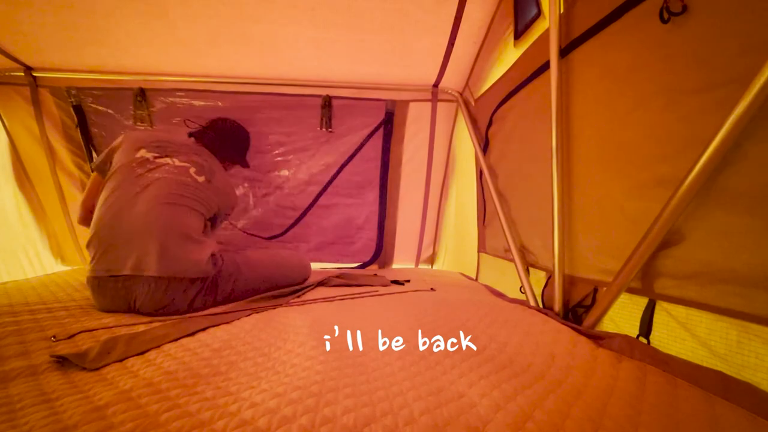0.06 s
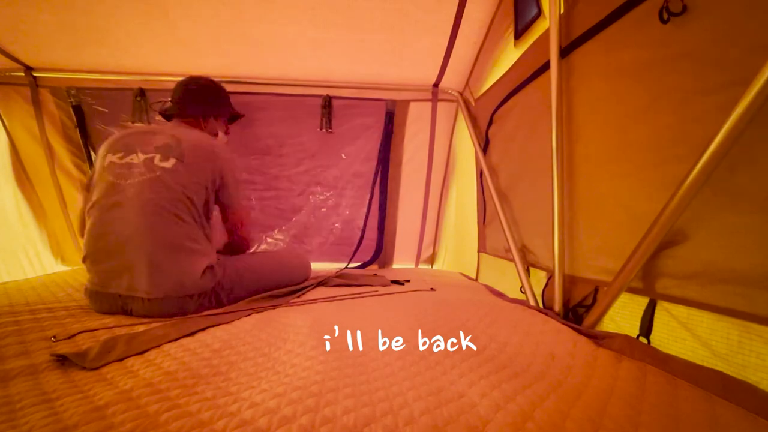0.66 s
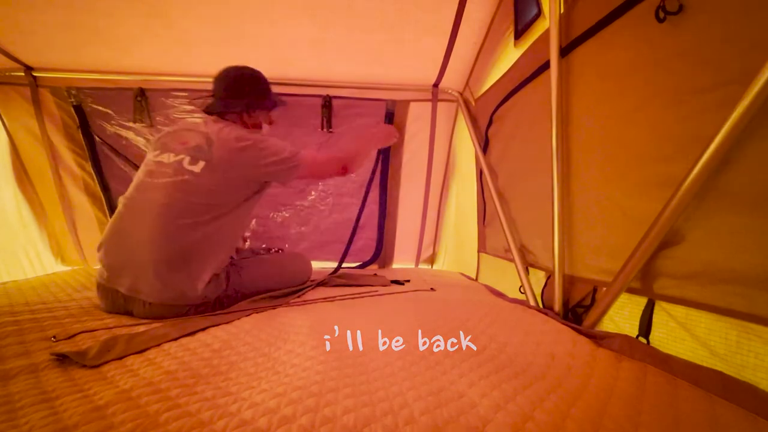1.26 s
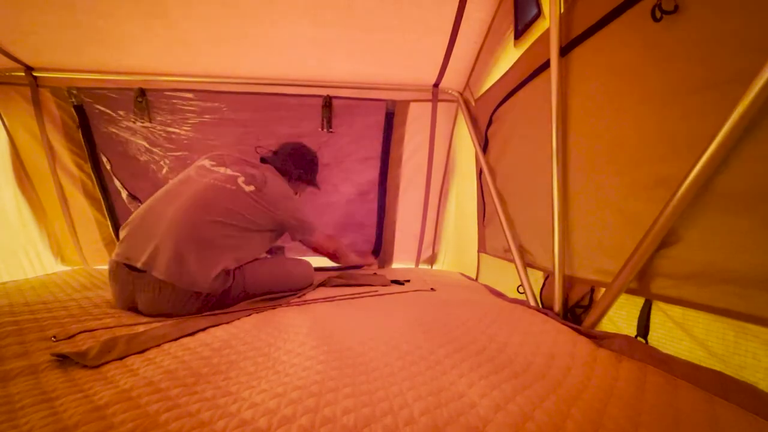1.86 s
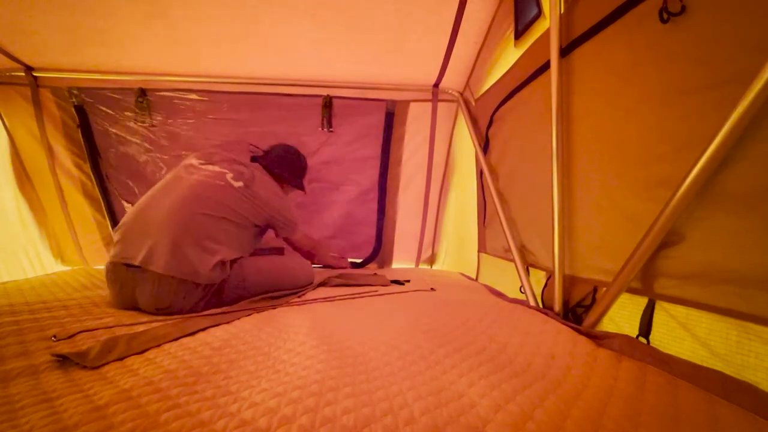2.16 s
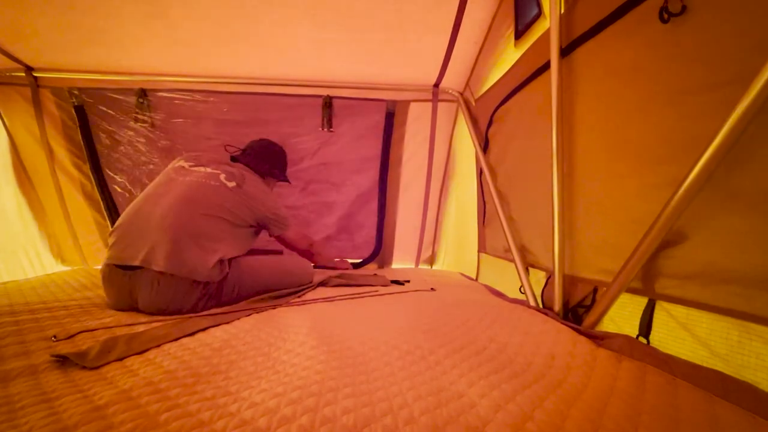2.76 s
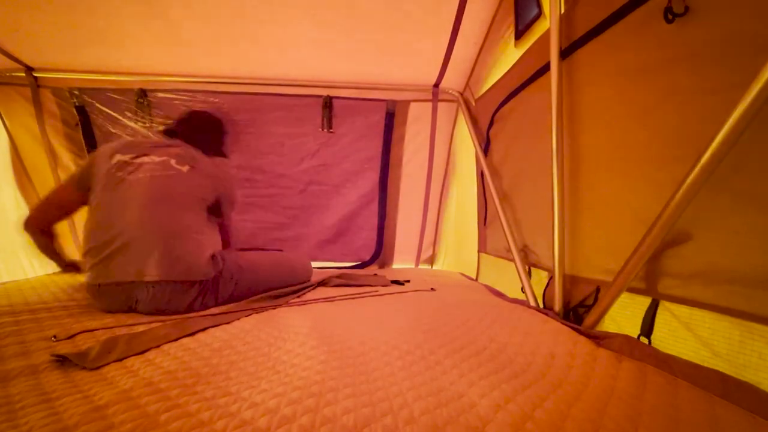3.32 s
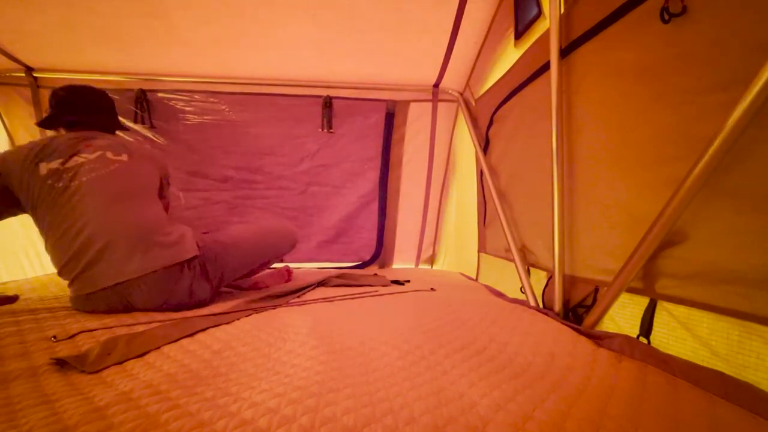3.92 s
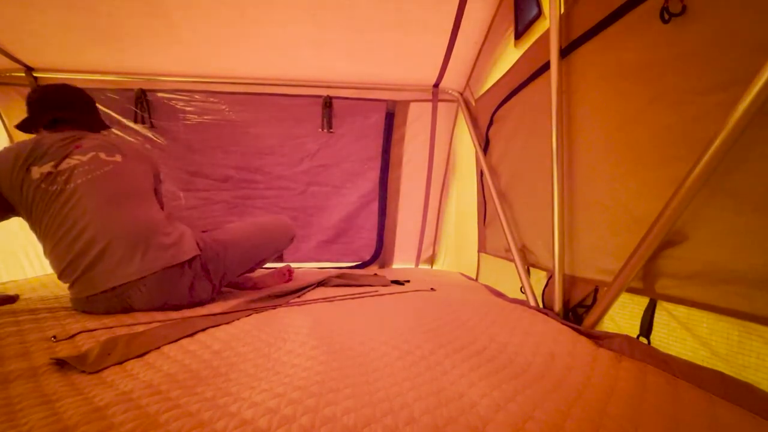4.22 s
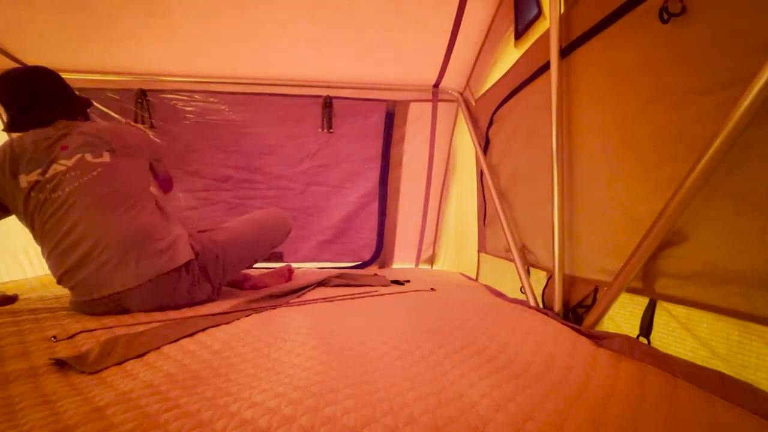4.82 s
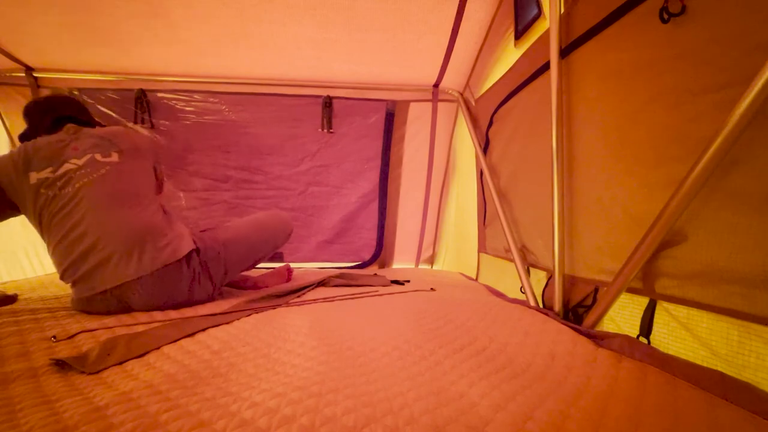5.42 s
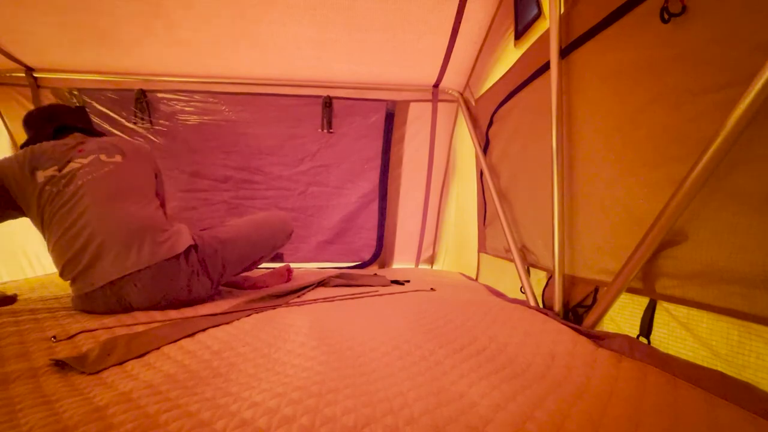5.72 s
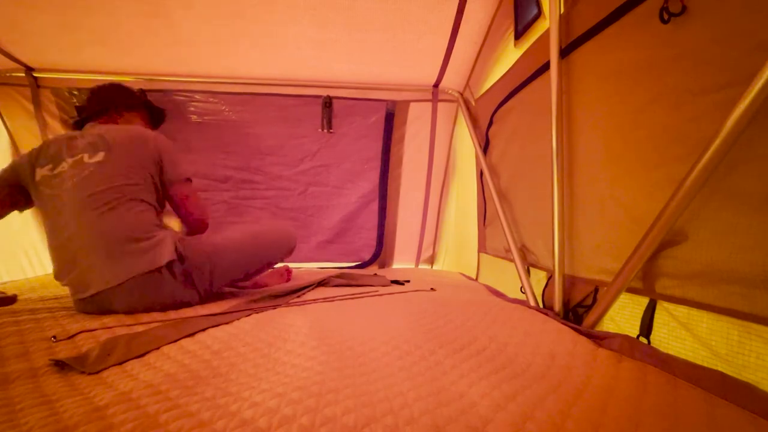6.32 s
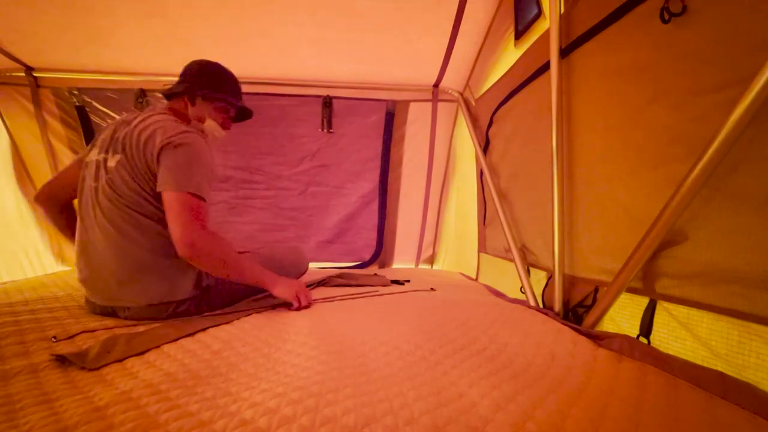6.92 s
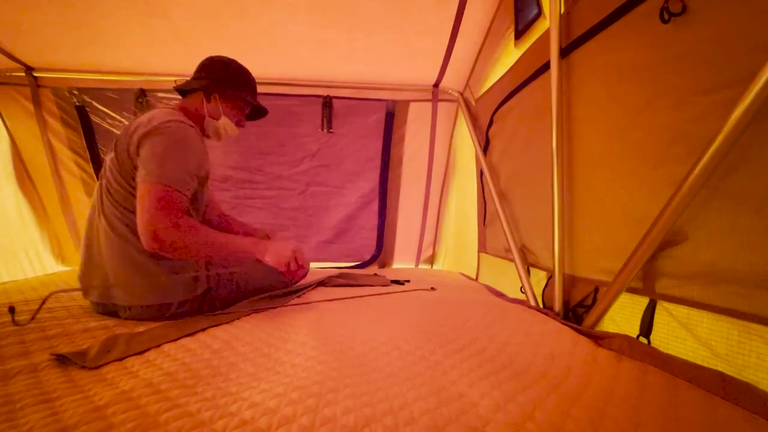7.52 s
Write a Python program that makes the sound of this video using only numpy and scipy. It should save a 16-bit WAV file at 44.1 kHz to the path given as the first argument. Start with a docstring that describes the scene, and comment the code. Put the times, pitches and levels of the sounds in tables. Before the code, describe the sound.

Inside a small tent, someone zips a window closed in several rasping pulls, amid clicking metal tabs and rustling cloth.

```python
"""Zipping shut a tent window

Someone zips a panel shut inside a small tent: a short nudge, then three long strokes.
The slider strikes two rows of teeth in turn, so it rasps and whines, higher as it speeds up.
When it creeps, the teeth tick one by one. The pulled fabric flutters and flaps, pull tabs click,
and clothes rustle and swish. The tent adds a very short echo, and the outdoors rumbles faintly."""
import sys
import numpy as np
from scipy import signal
from scipy.fft import rfft, irfft, next_fast_len
from scipy.io import wavfile

SR = 44100
rng = np.random.default_rng(int(sys.argv[2]) if len(sys.argv) > 2 else 0)


def wrap_up_sound(samples):
    """Save the sound to the file named by the first command line argument, as 16-bit audio."""
    columns = np.atleast_2d(samples).T
    # keep every value between -1 and 1, then stretch to whole-number steps
    tamed = np.clip(columns, -1, 1)
    steps = np.round(tamed * 32767).astype(np.int16)
    wavfile.write(sys.argv[1], SR, steps)


N = 334278
T = np.arange(N) / SR


def undb(db):
    """Turn decibels into a number to multiply by."""
    return 10 ** (np.asarray(db) / 20)


def unit(x):
    """Scale a signal so that its average power is 1."""
    return x / np.sqrt(np.mean(x ** 2) + 1e-20)


def gain_at(points, hz):
    """Read the gain at a pitch from a tone curve with rows of pitch_hz, level_db."""
    pitch_hz, level_db = np.transpose(points)
    return undb(np.interp(np.log(hz + 1), np.log(pitch_hz), level_db))


def colour(x, points):
    """Filter a sound with a tone curve; white noise keeps its power."""
    size = 4096
    gain = unit(gain_at(points, np.fft.rfftfreq(size, 1 / SR)))
    # make the filter ring only after a sound, never before it
    cepstrum = irfft(np.log(gain))
    cepstrum[1:size // 2] *= 2
    cepstrum[size // 2 + 1:] = 0
    ring = irfft(np.exp(rfft(cepstrum)))
    return signal.fftconvolve(x, ring)[:N]


def wander(hz):
    """A random curve of size about 1 that takes a new value hz times a second."""
    return unit(np.interp(T * hz, np.arange(N // 8), rng.standard_normal(N // 8)))


def grains(rate_hz, spread_db):
    """Rubbing noise made of tiny catches of uneven size."""
    return unit(rng.standard_normal(N) * undb(spread_db * wander(rate_hz)))


def bursts(starts_s, levels_db, decay_s):
    """A short, fading rattle of noise at each start time."""
    loudness = np.zeros(N)
    for start_s, level_db in zip(starts_s, levels_db):
        start = max(int(start_s * SR), 0)
        age = T[:min(SR // 8, N - start)]
        loudness[start:start + len(age)] += undb(level_db) * np.exp(-age / decay_s)
    return loudness * rng.standard_normal(N)


def gestures(table, attack_s, release_s):
    """Each movement swells, holds and dies away; gives one loudness curve per level column."""
    t = T[::64]
    power = 0
    for start_s, length_s, *levels_db in table:
        before = np.maximum(start_s - t, 0)
        after = np.maximum(t - start_s - length_s, 0)
        shape = np.exp(-before / attack_s - after / release_s)
        power = power + (undb(levels_db)[:, None] * shape) ** 2
    return [np.interp(T, t, np.sqrt(p)) for p in power]


def tent(x, echo_s, echo_db, lag_ms, left_db, shared_hz=285):
    """Direct sound plus brief echoes off moving cloth walls; both ears share the bass."""
    size = next_fast_len(N + SR // 4)
    hz = np.fft.rfftfreq(size, 1 / SR)
    age = T[:SR // 4]
    tails = rng.standard_normal((2, 2, len(age))) * undb(-60 * age / echo_s) * np.minimum(age / .002, 1)
    tails /= np.sqrt(np.sum(tails ** 2, axis=-1, keepdims=True))
    echo_share = hz ** 4 / (hz ** 4 + shared_hz ** 4) / np.sqrt(1 + undb(-echo_db) ** 2)
    sides = np.array([[1], [-1]])
    lag = np.exp(1j * np.pi * hz * sides * lag_ms / 1000)  # one ear hears it first
    spectrum = rfft(x, size)
    direct = irfft(spectrum * lag * np.sqrt(1 - echo_share ** 2), size)[:, :N]
    first, second = irfft(spectrum * echo_share * rfft(tails, size), size)[..., :N]
    # as the walls billow, one pattern of echoes gives way to another
    billow = np.pi * wander(7)
    return (direct + first * np.cos(billow) + second * np.sin(billow)) * undb(sides * left_db / 2)


def hand_pull(stroke, fade_s=.022):
    """One stroke's teeth per second and pulling force; the hand takes up and lets go smoothly."""
    time_s, rate_hz, pull_db = np.transpose(stroke)
    fade = np.clip(.5 + np.minimum(T - time_s[0], time_s[-1] - T) / fade_s, 0, 1)
    rate = (fade > 0) * np.interp(T, time_s, rate_hz)
    pull = fade * undb(np.interp(T, time_s, pull_db))
    return np.array([rate, pull])


def squeal(multiple):
    """How one tone of the whine, at this multiple of the tooth rate, briefly swells or sinks."""
    # swells and dips: peak_s, width_s, multiple, change_db
    swells = [(0.04, 0.047, 1, -1), (0.102, 0.012, 2, 11), (1.462, 0.042, 2, 10.5), (1.44, .02, 4, 13),
              (1.586, 0.026, 3, 8.5), (1.72, 0.05, 3, 5), (1.794, 0.036, 1, 13.5), (1.808, 0.015, 2, 4),
              (2.92, 0.068, 2, -6.5), (2.945, 0.019, 1, 8.5), (3.06, 0.035, 2, 7.5), (3.18, 0.022, 3, 3),
              (3.309, 0.017, 2, 2), (3.441, 0.019, 2, 9)]
    return undb(sum(change_db * np.exp(-.5 * ((T - peak_s) / width_s) ** 2)
                    for peak_s, width_s, k, change_db in swells if round(k) == multiple))


def zipper(rate_hz, whine_gain, rasp_gain, jitter=.023, shudder_db=2, row_db=-1, fray_db=-9,
           overtone_db=-3, rasp_db=6, bite=.42, hollow_hz=1500, fast_hz=1200):
    """Two rows of teeth mesh in turn: a whine with a strong octave, and a rasp at each tooth."""
    # how well tape and panel give off the two lowest tones: pitch_hz, level_db
    whine_tone = [(200, -1), (450, 8), (620, 7.5), (820, 5.5), (1050, 3), (1220, 8.5), (1480, 15),
                  (2000, 7), (2600, 9), (3500, 7.5), (4300, 2.5)]
    # the same for the higher tones: pitch_hz, level_db
    upper_tone = [(300, 21), (1200, 1), (2400, 5), (2900, 6), (3400, 2), (4000, -1), (4900, 8),
                  (5700, -7.5), (9000, 4)]
    # tone of the slider scraping the teeth: pitch_hz, level_db
    rasp_tone = [(250, -14.5), (450, -4.5), (800, -7), (1700, -2), (2700, -6), (4000, -10), (4900, -11),
                 (5700, -12), (6300, -6), (6900, -3.5), (7500, -16), (8400, -8), (10200, -16.5),
                 (12400, -11), (16000, -16)]
    row, octave = (whine_gain * gain_at(whine_tone, k * rate_hz) * squeal(k) for k in (1, 2))
    # the slider catches and hurries, so the teeth never come quite evenly
    phase = 2 * np.pi * np.cumsum(rate_hz * (1 + jitter * wander(220))) / SR
    grip = unit(undb(shudder_db * wander(170)))
    whine = undb(row_db) * row * np.sin(phase) + octave * np.sin(2 * phase)
    # the flexing tape shakes the octave in size and timing, which frays it
    fray = (wander(600) * np.sin(2 * phase) + wander(600) * np.cos(2 * phase)) / np.sqrt(2)
    whine += undb(fray_db) * octave * fray
    for k in range(3, 9):
        strength = whine_gain * squeal(k) * gain_at(upper_tone, k * rate_hz) * (3 / k) ** 1.72
        flicker = 1 + .6 * wander(300)
        whine += undb(overtone_db) * strength * flicker * np.sin(k * phase + .44 * wander(300))
    strikes = unit(np.exp(bite * (np.cos(2 * phase) + np.cos(phase))))
    rasp = colour(grains(1100, 1.6) * strikes * rasp_gain * grip, rasp_tone) * undb(rasp_db)
    # a fast slider skims the teeth, so its rasp sounds thinner
    body = signal.sosfiltfilt(signal.butter(2, hollow_hz, fs=SR, output="sos"), rasp)
    rasp -= body * rate_hz ** 2 / (rate_hz ** 2 + fast_hz ** 2)
    return (tent(np.sqrt(2) * whine * grip, echo_s=.05, echo_db=8, lag_ms=.16, left_db=1.65)
            + tent(rasp, echo_s=.12, echo_db=3, lag_ms=.054, left_db=2.5))


def fabric(shake, rise_s=.0072, flap_db=-2, drum_db=-2, sway_db=-1, sag=.6, slack_db=-6,
           rest_drum_db=-62, rest_sway_db=-60):
    """Pulls and shoves make the tight panel drum and the slack walls sway; jerks make the panel flap."""
    # a hand or body shoves the tent: start_s, length_s, drum_db, sway_db
    shoves = [(0.0, 0.15, -42, -49.5), (0.205, .02, -54, -43.5), (0.38, 0.037, -47.5, -46),
              (0.885, 0.13, -40.5, -43), (1.585, 0.017, -35.5, -54), (2.012, 0.058, -26.5, -59),
              (2.08, 0.13, -40.5, -43), (2.31, 0.045, -43.5, -47), (2.41, 0.12, -50, -42),
              (2.68, 0.15, -41.5, -47.5), (2.815, .025, -29, -43), (3.485, .025, -46, -32.5),
              (3.69, 0.11, -38, -39.5), (3.83, 0.067, -51, -41), (4.28, 0.42, -57, -58),
              (5.39, 0.038, -43.5, -57), (5.76, .05, -32.5, -38.5), (5.84, 0.045, -51, -47.5),
              (6.95, 0.11, -73, -56), (7.225, .02, -60, -55)]
    # tone of the tight panel: pitch_hz, level_db
    drum_tone = [(70, -27), (110, -2), (150, 1.5), (205, -1), (270, -7.5), (400, -13.5), (900, -50)]
    # tone of the slack walls: pitch_hz, level_db
    sway_tone = [(20, -50.5), (33, -18), (52, 3.5), (80, 4.5), (110, -0.5), (160, -9.5), (400, -53.5)]
    # the panel flaps or is bumped: start_s, level_db, middle_pitch_hz
    flaps = [(0.113, -28.5, 184), (0.37, -50, 108), (0.88, -45, 147), (0.915, -35, 134),
             (0.963, -32.5, 134), (1.58, -32, 84), (1.86, -27.5, 196), (2.01, -17.5, 211),
             (2.405, -24, 137), (2.451, -24, 163), (3.695, -42, 80), (4.471, -44.5, 169), (5.394, -35, 123),
             (5.816, -24.5, 176)]
    drum, sway = gestures(shoves, attack_s=.02, release_s=.016)
    drum = np.sqrt(drum ** 2 + shake ** 2 + undb(rest_drum_db) ** 2)
    sway = np.sqrt(sway ** 2 + (shake * undb(slack_db)) ** 2 + undb(rest_sway_db) ** 2)
    out = colour(rng.standard_normal(N), drum_tone) * drum * undb(drum_db)
    out += colour(rng.standard_normal(N), sway_tone) * sway * undb(sway_db)
    age = T[:SR // 6] / rise_s  # a flap is loudest at age 1
    for start_s, level_db, middle_hz in flaps:
        start = int(start_s * SR)
        pitch_hz = middle_hz * (1 + sag * (np.exp(-age / 2) - .5))  # sinks as the panel slackens
        swing = np.sin(2 * np.pi * np.cumsum(pitch_hz) / SR)
        out[start:start + len(age)] += undb(level_db + flap_db) * age * np.exp(1 - age) * swing
    return tent(out, echo_s=.011, echo_db=13, lag_ms=-.48, left_db=-1.5)


def outdoors(level_db=-62, swell_db=1, split_hz=300):
    """A faint, dull rumble from outside; only its bass is alike in both ears."""
    # tone of the rumble: pitch_hz, level_db
    rumble_tone = [(25, -12), (55, -7), (110, -22), (250, -12.5), (450, -28.5), (820, -14), (1600, -26),
                   (3000, -38.5), (8000, -46), (15000, -45)]
    low_pass = signal.butter(2, split_hz, fs=SR, output="sos")
    high_pass = signal.butter(2, split_hz, "high", fs=SR, output="sos")
    bass = signal.sosfilt(low_pass, rng.standard_normal(N))
    air = signal.sosfilt(high_pass, rng.standard_normal((2, N)))
    rumble = np.array([colour(bass + side, rumble_tone) for side in air])
    return rumble * undb(level_db + swell_db * wander(11))


def tooth_ticks(gap_s=.0158, snap_db=2, tug_db=-2):
    """A creeping slider passes the teeth one by one; each snaps and tugs the panel."""
    # the slider creeps: start_s, tooth_count, snap_db, tug_db
    creeps = [(0.047, 1, -43, -31), (0.864, 1, -40, -36.5), (0.963, 2, -38.5, -37), (2.008, 4, -31, -24),
              (2.074, 3, -26.5, -26), (2.130, 1, -27, -25.5), (2.18, 1, -29.5, -26), (2.457, 1, -33, -31),
              (2.706, 7, -39, -33), (2.822, 2, -37, -33)]
    # tone of a snapping tooth: pitch_hz, level_db
    snap_tone = [(200, 10.5), (700, 15.5), (1000, 7), (1400, 20.5), (1900, 1.5), (2500, 12), (3400, 7),
                 (4500, -10.5), (6600, 4), (15000, -15)]
    # tone of the tugged panel: pitch_hz, level_db
    tug_tone = [(60, -31), (130, -30), (220, 12.5), (400, -3), (800, -6.5), (2000, -25)]
    ticks = [(start_s + k * gap_s, snap, tug)
             for start_s, count, snap, tug in creeps for k in range(round(count))]
    starts_s, snaps_db, tugs_db = np.transpose(ticks)
    snap = colour(bursts(starts_s, snaps_db, decay_s=.0039), snap_tone) * undb(snap_db)
    tug = colour(bursts(starts_s, tugs_db, decay_s=.0055), tug_tone) * undb(tug_db)
    return tent(snap + tug, echo_s=.055, echo_db=0, lag_ms=.05, left_db=0)


def tab_clicks(knock_db=2, tick_db=5):
    """Metal pull tabs knock against the slider and the tape."""
    # each hit of a tab: start_s, knock_db, tick_db
    hits = [(0.07, -32.5, -50), (0.1422, -37, -46), (0.1844, -48.5, -63), (0.2922, -35.5, -36),
            (0.375, -45, -49), (0.645, -52, -63), (0.7958, -50.5, -72), (0.864, -49.5, -48.5),
            (3.6777, -37, -32.5), (4.2726, -64, -59), (4.9396, -51, -47.5), (5.255, -55, -58),
            (5.336, -55, -55.5), (5.3934, -45, -43)]
    # tone of the knock: pitch_hz, level_db
    knock_tone = [(300, -8), (1500, 13.5), (3500, 7.5), (6000, 8.5), (9000, -2.5)]
    # tone of the bright tick on top: pitch_hz, level_db
    tick_tone = [(3500, -28), (6500, 16), (7600, 9), (9000, 14), (13000, 14.5), (16000, -41)]
    starts_s, knocks_db, ticks_db = np.transpose(hits)
    knock = colour(bursts(starts_s, knocks_db, decay_s=.0058), knock_tone) * undb(knock_db)
    tick = colour(bursts(starts_s, ticks_db, decay_s=.0035), tick_tone) * undb(tick_db)
    return tent(knock + tick, echo_s=.07, echo_db=-1, lag_ms=.02, left_db=1)


def clothes(hiss_db=2.5, rub_db=-.5, left_db=1, fidget_hiss_db=-72, fidget_rub_db=-63,
            still_s=7.15, settle_s=.053):
    """Cloth slides on cloth: a grainy hiss over a duller rub, so spread out that each ear hears its own."""
    # a sleeve or trouser leg slides: start_s, length_s, hiss_db, rub_db
    slides = [(0.1, 0.1, -64, -55.5), (0.23, 0.1, -64, -63), (0.32, 0.16, -59.5, -51),
              (0.52, 0.13, -54, -50), (0.83, 0.087, -71, -52), (0.98, 0.016, -53.5, -43),
              (1.07, 0.11, -69, -61.5), (1.22, 0.14, -62.5, -56.5), (2.12, 0.11, -51.5, -49),
              (2.28, 0.087, -60.5, -51), (2.44, 0.059, -48.5, -45), (2.58, 0.21, -54.5, -49.5),
              (3.68, 0.059, -49, -45), (4.06, .06, -71.5, -64), (4.32, 0.041, -69, -60),
              (4.545, 0.042, -54.5, -57), (4.83, 0.052, -59, -66), (5.035, 0.016, -57, -72),
              (5.2, 0.022, -62.5, -70), (5.42, 0.11, -45, -61.5), (5.85, 0.0089, -61, -53),
              (6.11, 0.097, -63.5, -68), (6.25, 0.028, -58.5, -62), (6.48, 0.26, -67.5, -61),
              (6.7, 0.064, -63, -57), (6.905, 0.026, -68, -56.5), (6.99, 0.065, -59.5, -104)]
    # tone of the hiss: pitch_hz, level_db
    hiss_tone = [(1500, -8), (3500, 2), (5000, 0), (5700, -4), (6600, 5), (7500, -5.5), (8600, 1.5),
                 (10200, -5), (12800, -4.5), (16000, -31.5)]
    # tone of the rub: pitch_hz, level_db
    rub_tone = [(200, -10), (450, 0.5), (850, -3), (1600, -2), (3000, -9.5), (5000, -13.5), (9000, -24)]
    hiss, rub = gestures(slides, attack_s=.029, release_s=.041)
    fidget = np.exp(-np.maximum(T - still_s, 0) / settle_s)  # the person shifts about, then sits still
    hiss = np.hypot(hiss * undb(hiss_db), fidget * undb(fidget_hiss_db))
    rub = np.hypot(rub * undb(rub_db), fidget * undb(fidget_rub_db))
    ears = [colour(hiss * grains(700, .68), hiss_tone) + colour(rub * grains(250, 2.65), rub_tone)
            for _ in range(2)]
    return np.array(ears) * undb(np.array([[left_db], [-left_db]]) / 2)


def swishes():
    """Hands flick over smooth fabric in short, bright strokes that swell and fade."""
    # each flick: peak_s, level_db, width_s
    flicks = [(2.467, -38.5, 0.0052), (2.806, -31, 0.0019), (2.9, -38.5, .018), (6.701, -48, 0.013),
              (7.029, -42, 0.024)]
    # tone of a flick: pitch_hz, level_db
    swish_tone = [(2000, -8), (5000, -5), (6500, 8), (7600, 2.5), (9000, 0.5), (12000, -0.5), (14000, -6),
                  (16000, -14)]
    loudness = sum(undb(level_db) * np.exp(-.5 * ((T - peak_s) / width_s) ** 2)
                   for peak_s, level_db, width_s in flicks)
    swish = colour(loudness * grains(900, 1), swish_tone)
    return tent(swish, echo_s=.013, echo_db=34, lag_ms=.0067, left_db=1.5)


def scene():
    """Everything heard inside the tent; the same pull drives the zipper and shakes the panel."""
    # the hand's motion in each stroke: time_s, tooth_rate_hz (of one row), pull_db
    nudge = [(0.0, 870.5, -43), (0.042, 447.5, -54.5), (0.082, 645.3, -48), (0.114, 323.4, -55.5),
             (0.135, 150.7, -87)]
    first = [(1.32, 290.5, -53.5), (1.35, 424.3, -50), (1.422, 733.7, -44.5), (1.49, 684.7, -49.5),
             (1.522, 763.8, -44), (1.576, 753.8, -47), (1.62, 909.1, -44.5), (1.646, 859.5, -43),
             (1.77, 1104, -45.5), (1.802, 1034, -43), (1.86, 744.8, -46), (1.884, 824.8, -46),
             (1.904, 725.1, -41), (1.93, 867.2, -44), (1.96, 670.5, -42.5), (1.998, 327.9, -44.5),
             (2.014, 211.5, -42.5), (2.07, 115.3, -49.5)]
    second = [(2.79, 136.5, -52), (2.814, 215.2, -42), (2.83, 371.5, -43.5), (2.85, 588.0, -43),
              (2.882, 687.5, -39), (2.982, 580.7, -46), (3.05, 849.5, -43), (3.122, 1059, -41),
              (3.24, 1096, -45), (3.288, 751.6, -46.5), (3.33, 732.5, -51), (3.4, 1082, -39),
              (3.426, 1113, -45.5), (3.51, 518.7, -48), (3.614, 799.3, -46), (3.638, 554.8, -47.5),
              (3.66, 777.7, -50), (3.675, 743.2, -43.5)]
    third = [(5.39, 139.8, -58), (5.42, 329.9, -49.5), (5.434, 444.0, -53), (5.478, 575.8, -46.5),
             (5.52, 645.1, -45), (5.596, 1229, -40.5), (5.662, 1720, -38.5), (5.736, 2145, -38),
             (5.77, 1357, -41.5), (5.788, 1142, -39), (5.796, 860.9, -45.5), (5.816, 369.0, -49.5),
             (5.825, 221.0, -48)]
    # what the tape's tightness adds to the pull, one row per stroke: shake_db, whine_db, rasp_db
    tightness = [(-3, -6, -0.5), (2.5, 1, 0.5), (0.5, 1, 0), (-6, -1.3, -1.5)]
    rates, pulls = np.stack([hand_pull(stroke) for stroke in (nudge, first, second, third)], axis=1)
    shake, whine_gain, rasp_gain = undb(tightness).T @ pulls
    return (zipper(rates.sum(axis=0), whine_gain, rasp_gain) + tooth_ticks() + tab_clicks()
            + fabric(shake) + clothes() + swishes() + outdoors())


def record(dry, low_hz=36, top_hz=16100):
    """The microphone drops the deepest bass and the recorder cuts the highest treble."""
    heard = signal.sosfilt(signal.butter(3, low_hz, "high", fs=SR, output="sos"), dry)
    return signal.sosfiltfilt(signal.ellip(8, .1, 60, top_hz, fs=SR, output="sos"), heard)


dry = scene()
out = record(dry)
wrap_up_sound(out)
```